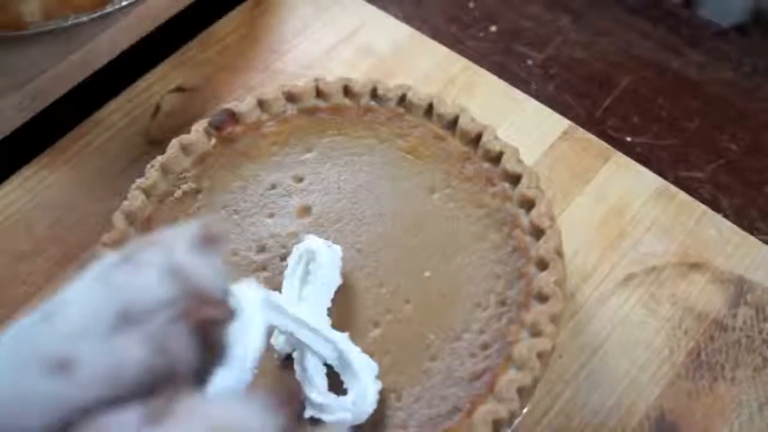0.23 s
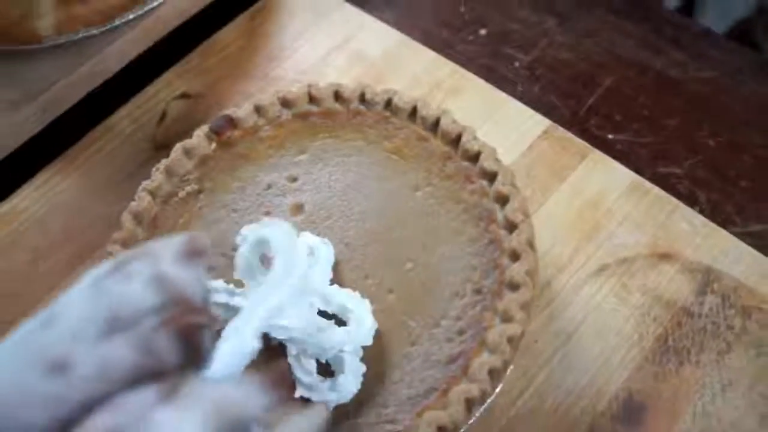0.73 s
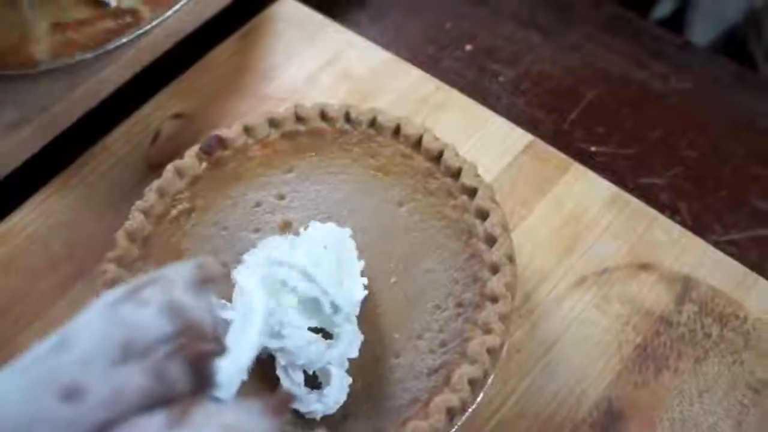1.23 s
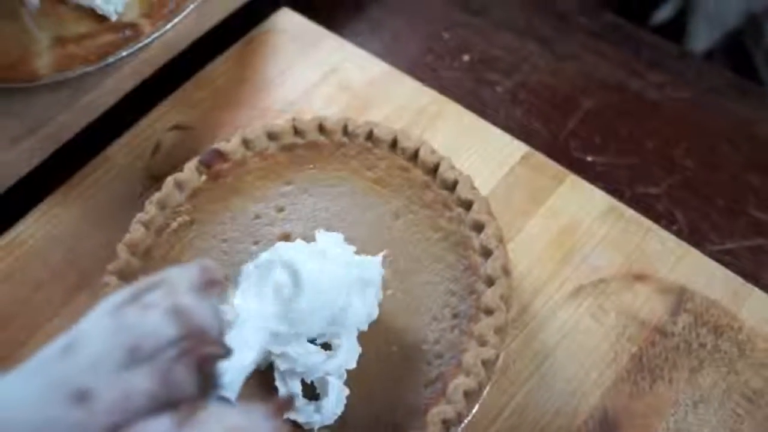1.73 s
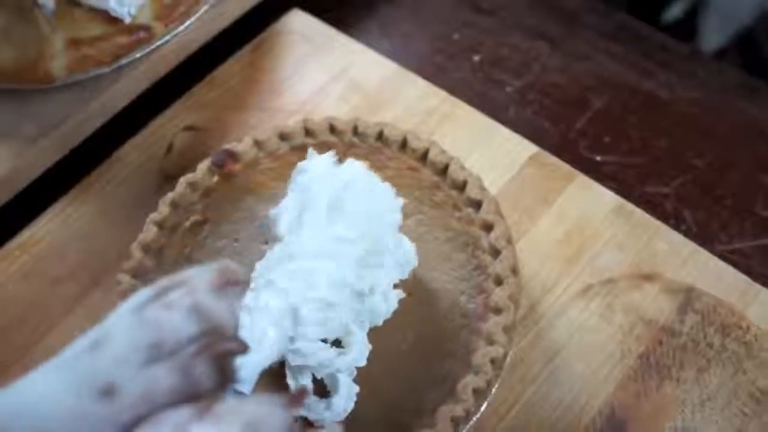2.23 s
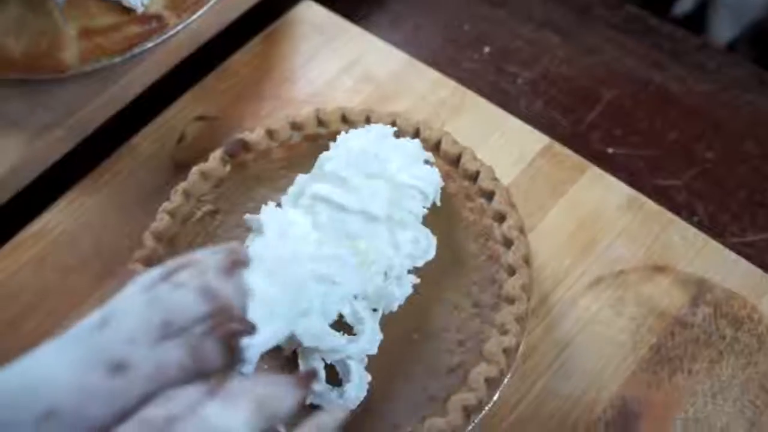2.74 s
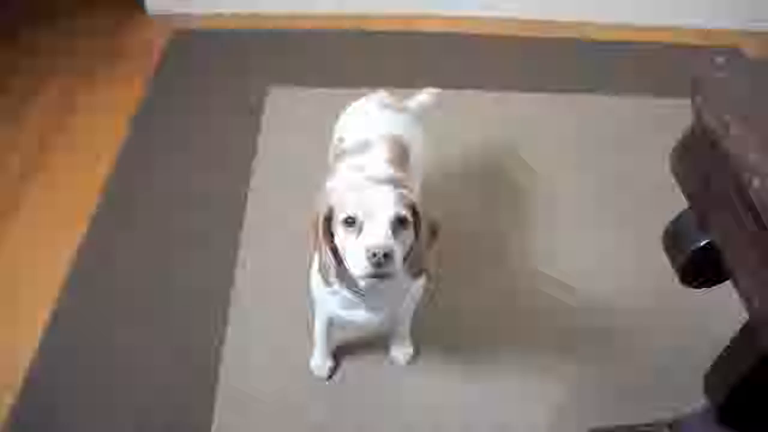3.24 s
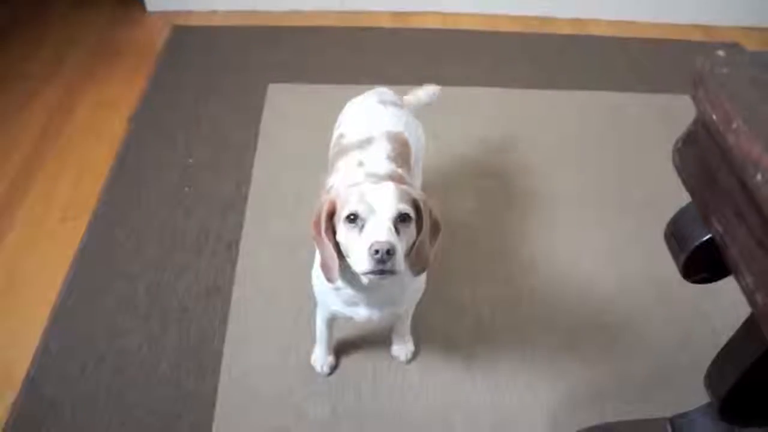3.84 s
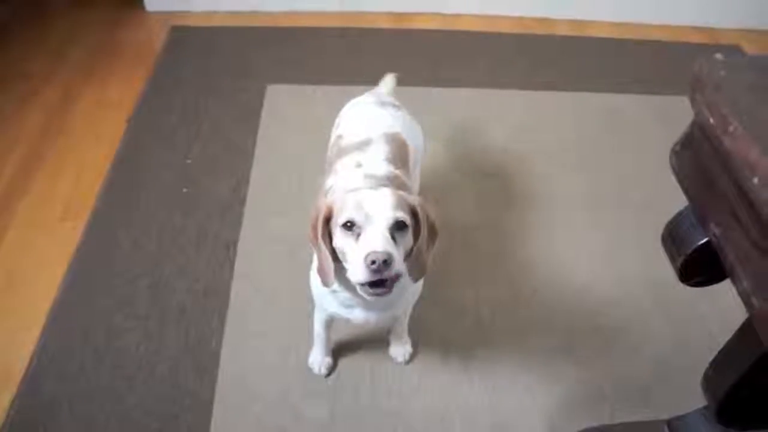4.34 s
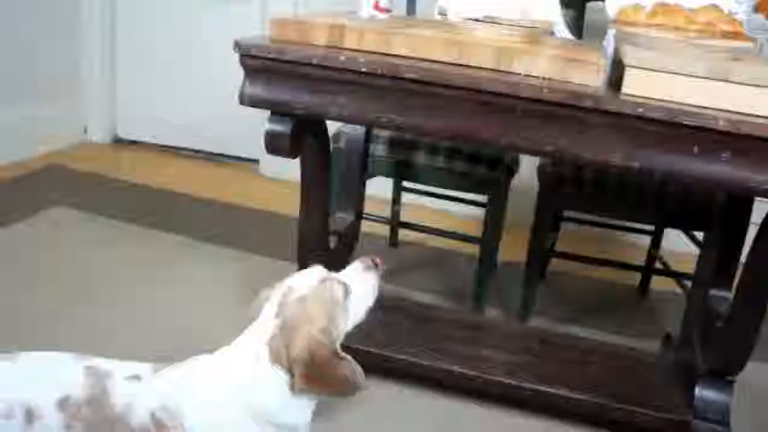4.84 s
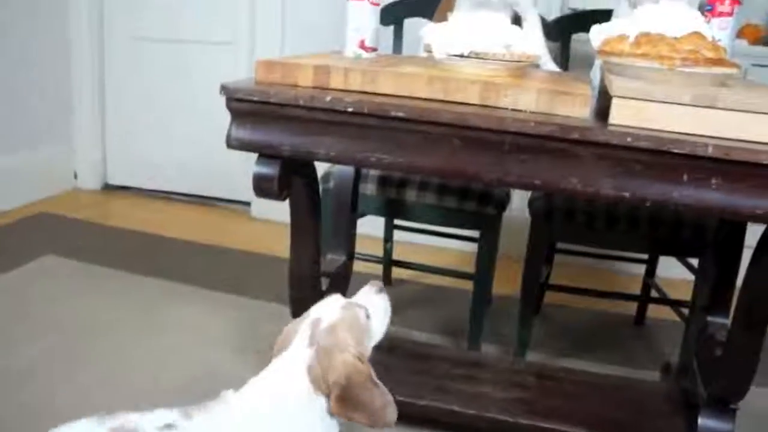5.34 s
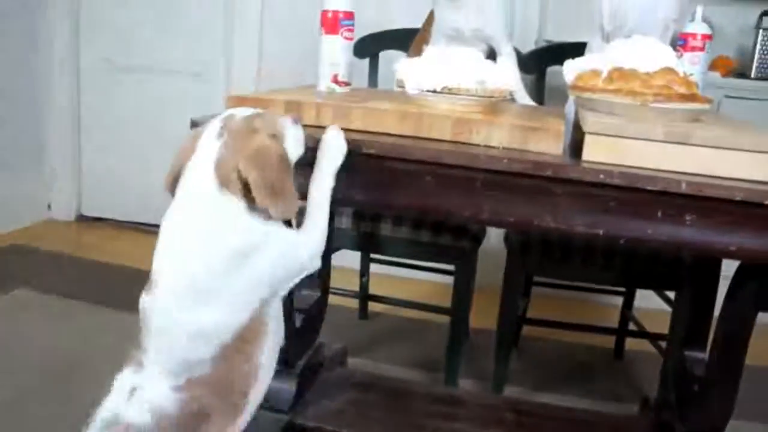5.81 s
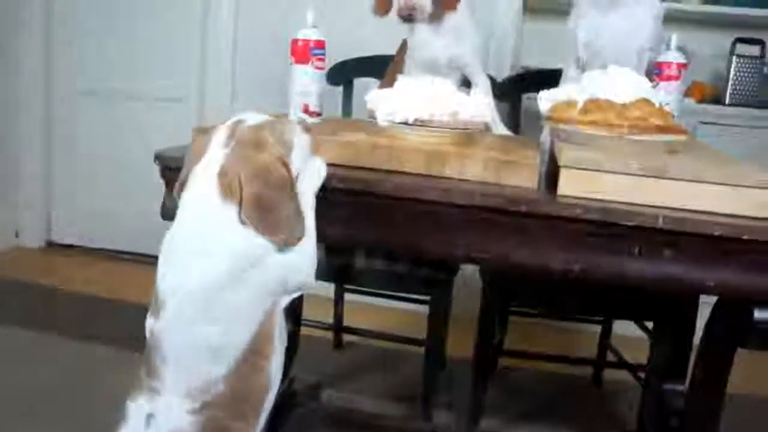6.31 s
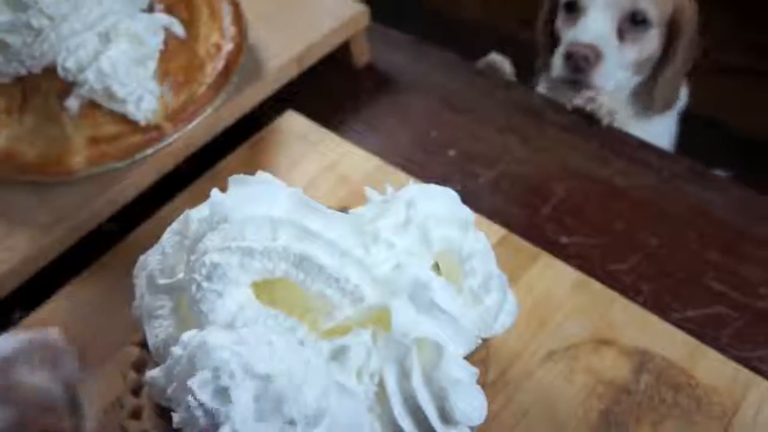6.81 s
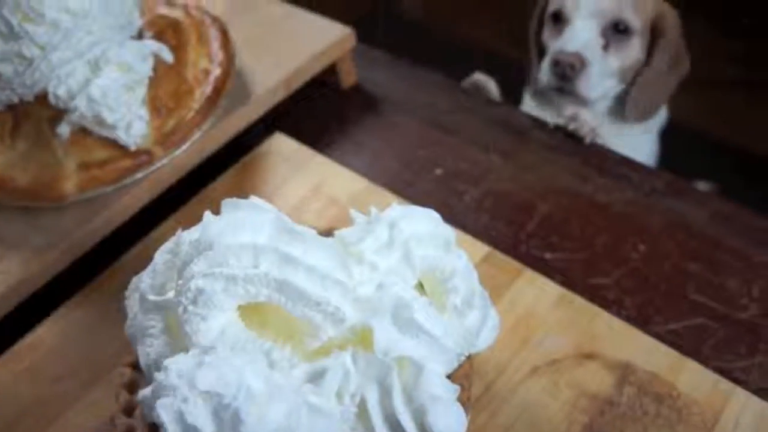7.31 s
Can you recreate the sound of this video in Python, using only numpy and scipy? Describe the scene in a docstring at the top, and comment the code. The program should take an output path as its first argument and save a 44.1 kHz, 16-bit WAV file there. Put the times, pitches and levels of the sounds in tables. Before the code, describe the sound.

A quiet kitchen, heard close in stereo, with a faint steady room hush and short reverberation. From 0 s an aerosol cream can is already spraying: a bright, gassy, whistling hiss with fine mist and light crackle. From about 1.5 to 2.5 s it turns creamier and raspier; around 2.6 s it becomes thicker, with a hollow foam gurgle. From 3.5 to 6.5 s it sputters wetly, dense with sharp little pops and cracks, its tone constantly shifting. A soft low bump at 5.5 s is almost masked. Near 6.3 s the gurgle surges, then the spray shuts off at about 6.6 s. After a tiny gap, a short, coarse, spitting squirt runs from roughly 6.75 to 7.1 s and closes quickly. Faint bright clicks of settling cream follow in near quiet. At about 7.4 s the can knocks softly and hollowly on the table with a tiny rattle.

```python
"""A kitchen, two microphones close by: a can sprays whipped cream onto a pie, one long squirt, a short one, then quiet.
Gas noise rings the jet, tip, throat and nozzle as hiss, crackle and sputter, and gurgles hollow in the foam.
Pockets bursting through the cream pop as short damped rings with a crack of noise; settling drops click faintly.
A filtered-noise tail answers over a steady hush; something soft bumps the table under the long squirt.
At the end the can knocks softly as it is put down: short damped rings at its modes."""
import sys
import numpy as np
from scipy import signal
from scipy.fft import rfft, irfft, next_fast_len
from scipy.io import wavfile
from scipy.ndimage import uniform_filter1d

SR = 44100
rng = np.random.default_rng(int(sys.argv[2]) if len(sys.argv) > 2 else 0)


def persist_wave(psi):
    """Save psi, clipped to +-1, as 16-bit WAV."""
    counts = np.round(np.clip(psi, -1, 1) * 32767).astype(np.int16)
    wavfile.write(sys.argv[1], SR, np.atleast_2d(counts).T)


N = 333377
TIME = np.arange(N) / SR
SIZE = next_fast_len(N + SR)  # room for a 1 s tail


def undb(db):
    """Amplitude factor of a level in dB."""
    return 10 ** (np.asarray(db) / 20)


def level(x, db):
    """Scale x to an rms level in dB."""
    return x * undb(db) / np.sqrt(np.mean(x ** 2))


def over_time(table):
    """A (s, value) table read at every sample, straight between rows."""
    return np.interp(TIME, *np.transpose(table))


def across(table):
    """A (Hz, value) table read at every FFT bin, straight on a log-frequency axis."""
    hz, value = np.transpose(table)
    bin_hz = np.arange(SIZE // 2 + 1) * SR / SIZE
    return np.interp(np.log(bin_hz + 1), np.log(hz), value)


def colour(x, gain):
    """Filter x by a gain given per FFT bin."""
    return irfft(rfft(x, SIZE) * gain, SIZE)[..., :N]


def resonate(x, modes):
    """Parallel band-passes; neighbours alternate in sign so that the valleys stay filled."""
    out = 0
    for k, (hz, width_hz, db) in enumerate(modes):
        band = signal.lfilter(*signal.iirpeak(hz, hz / width_hz, SR), x)
        out = out + (-1) ** k * undb(db) * band
    return out


def walk(rate_hz):
    """Smooth random wander about 0: values held 1 / rate_hz seconds and slewed twice."""
    hold = int(SR / rate_hz)
    steps = np.repeat(rng.standard_normal(N // hold + 1), hold)
    return 0.54 * uniform_filter1d(uniform_filter1d(steps, hold), hold)[:N]


def rings(events, rise_s):
    """Damped sines, one per (s, dB, Hz, t60 s) event, each swelling for rise_s first."""
    out = np.zeros(N)
    for start_s, db, hz, t60_s in events:
        t = TIME[:int((rise_s + t60_s) * SR)]
        swell = np.minimum(t / rise_s, 1) ** 2
        decay = undb(db - 60 * np.maximum(t - rise_s, 0) / t60_s)
        ring = np.sin(2 * np.pi * hz * t) * swell * decay
        i = int(start_s * SR)
        out[i:i + len(t)] += ring[:N - i]
    return out


# Spectrum of the room hush. Each row: frequency in Hz, relative level in dB per Hz.
HUSH = [(15, -29), (25, -8), (60, -8.5), (105, -13), (243, -5), (501, -5.5), (604, -14), (749, -4),
        (856, -10.5), (1150, -9), (2180, -19.5), (9000, -27.5), (15000, -36)]
HUSH_RMS_DB = -61


def kitchen():
    """Steady hush of the room; its bass is largely common to both microphones, its treble is not."""
    mid, side = colour(rng.standard_normal((2, N)), undb(across(HUSH)))
    side_db = across([(40, -12.5), (500, -6.5), (3000, 1.5)])
    side = colour(side, undb(side_db))
    return level(np.array([mid + side, mid - side]), HUSH_RMS_DB)


# Reverberation of the kitchen. Each row: frequency in Hz, decay time t60 in s.
WALL_T60 = [(150, 0.35), (600, 0.53), (1500, 0.14), (3000, 0.2), (8000, 0.26)]
WALLS_DB = -11


def walls(x):
    """Reverberant tail: noise octaves with their own decay, alike at both microphones in the bass."""
    t, tail = TIME[:SR], 0
    table_hz, table_t60_s = np.transpose(WALL_T60)
    for hz in 125 * 2 ** np.arange(7):
        t60_s = np.interp(np.log(hz), np.log(table_hz), table_t60_s)
        mid, side = resonate(rng.standard_normal((2, SR)), [(hz, 1.1 * hz, 0)])
        band = mid + min(hz / 5000.0, 1) * side * np.array([[1], [-1]])
        tail = tail + band * undb(-60 * t / t60_s) * np.minimum(t / 0.00085, 1)
    tail = tail / np.sqrt(np.sum(tail ** 2, axis=1, keepdims=True))  # unit energy
    return colour(x, rfft(tail, SIZE)) * undb(WALLS_DB)


# Something soft bumps the table. Each row: start in s, level in dB, pitch in Hz, decay time t60 in s.
BUMP_EVENTS = [(5.544, -46, 85, 0.08)]


def bumps():
    """A low table thump: a damped sine with a slow rise."""
    return rings(BUMP_EVENTS, 0.0098)


# The can knocks and rocks on the table. Each row: start in s, level in dB.
KNOCKS = [(7.399, -52), (7.4405, -34), (7.461, -45.5), (7.468, -44), (7.476, -46), (7.483, -48)]
# Modes of the can. Each row: frequency in Hz, level in dB, decay time t60 in s.
CAN_MODES = [(320, -13, 0.045), (515, -12, 0.03), (710, -8, 0.03), (844, -12, .025), (1080, -3.5, 0.032)]


def can():
    """Every knock rings the same modes of the half-empty can."""
    events = [(s, db + mode_db, hz, t60_s) for s, db in KNOCKS for hz, mode_db, t60_s in CAN_MODES]
    return rings(events, 0.00064)


HOLLOW_HZ, HOLLOW_WIDTH_HZ, HOLLOW_DEPTH = 4900, 1500, 0.43  # the tip passes little of a pop here


def pops(events, cycles, crack_db):
    """A bursting pocket rings a few cycles at its pitch; a ragged crack of noise lasts a little longer."""
    body = rings([(s, db, hz, cycles / hz) for s, db, hz in events], 0.00076)
    shape = signal.lfilter([1], [1, -np.exp(-1 / (0.00061 * SR))], np.abs(body)) / (0.00055 * SR)
    crack_modes = [(1740, 740, crack_db + 0.5), (3570, 890, crack_db + 7.0), (7000, 3800, crack_db - 3.5)]
    crack = resonate(shape * rng.standard_normal(N), crack_modes)
    pop = 0.6 * body + 0.85 * crack
    return pop - HOLLOW_DEPTH * resonate(pop, [(HOLLOW_HZ, HOLLOW_WIDTH_HZ, 0)])


POPS_PER_S, POP_LOW_HZ, POP_HIGH_HZ = 55, 1540, 3880
POP_DB, POP_SPREAD_DB = -18, 4  # at 0 dB cream; spread to either side
POPS_FROM_S, POPS_EARLY_DB = 3.35, -3  # the jet spits more once the heap of cream is high


def random_pops(cream_db):
    """Pops at random moments and pitches, louder where the jet carries more cream."""
    moment, size, pitch, keep = rng.random((500, 4)).T
    kept = keep < POPS_PER_S * N / SR / len(keep)
    start_s = moment * N / SR
    db = POP_DB + cream_db[(start_s * SR).astype(int)]
    db = db + 2 * POP_SPREAD_DB * (size - 0.5)
    db = db + POPS_EARLY_DB * (start_s < POPS_FROM_S)
    hz = POP_LOW_HZ * (POP_HIGH_HZ / POP_LOW_HZ) ** np.sqrt(pitch)  # leans to the high end
    return np.transpose([start_s, db, hz])[kept]


# The finger on the valve. Each row: fully open from in s, starts to close in s.
VALVE_TIMES = [(0, 6.57), (6.768, 7.075)]
OPEN_DB_PER_S, CLOSE_DB_PER_S, CLOSE_DB_PER_S2 = 283, 202, 802.5


def valve():
    """Gain of the valve: it opens at a steady rate in dB and closes ever faster."""
    power = 0
    for opens_s, closes_s in VALVE_TIMES:
        early_s, late_s = np.maximum(opens_s - TIME, 0), np.maximum(TIME - closes_s, 0)
        loss_db = OPEN_DB_PER_S * early_s + CLOSE_DB_PER_S * late_s + CLOSE_DB_PER_S2 * late_s ** 2
        power = power + undb(-2 * loss_db)
    return np.sqrt(power)


def puffs(rate_hz, spread_db, length_s, steady_db, surge_db):
    """Gas pockets burst at random: short noise puffs, few large, over a steady flow; rows mid, side."""
    size_db = spread_db * np.minimum(rng.exponential(size=N), 3)
    starts = (rng.random(N) < rate_hz / SR) * undb(size_db)
    power = signal.lfilter([1], [1, -np.exp(-1 / (length_s * SR))], starts ** 2)
    flow = np.sqrt(power / power.mean() + undb(2 * steady_db))
    return flow * undb(surge_db * walk(25)) * rng.standard_normal((2, N))


SHIFT_HZ, SHIFT_DB, SHIFT_BELOW_HZ = 6, 1.6, 3000  # SHIFT_DB scales the wander


def shifting(x, modes):
    """Foam reshapes the passage: each low resonance swells and fades on its own."""
    out = 0
    for k, mode in enumerate(modes):
        swing_db = SHIFT_DB * walk(SHIFT_HZ) * (mode[0] < SHIFT_BELOW_HZ)
        out = out + (-1) ** k * undb(swing_db) * resonate(x, [mode])
    return out


# Resonances of the open jet. Each row: frequency in Hz, width in Hz, level in dB.
JET_MODES = [(130, 47, -14.5), (191, 32, -11), (230, 42, -6), (330, 60, -7), (480, 81, -4.5),
             (768, 74, -1.5), (1240, 95, -2), (1973, 280, -5), (2540, 103, -2.5), (2840, 210, -3.5),
             (4270, 860, -4), (5600, 620, 1), (6460, 470, 5), (7260, 950, 2), (8210, 880, 1.5)]
# Resonances of the fine mist. Each row: frequency in Hz, width in Hz, level in dB.
MIST_MODES = [(7140, 720, -3), (9490, 2230, 1.5), (13770, 1950, -4)]
# Resonances of the tip. Each row: frequency in Hz, width in Hz, level in dB.
TIP_MODES = [(3016, 600, -1.5), (3740, 1340, 0.5), (5630, 3100, -7.5)]
# Resonances of the throat. Each row: frequency in Hz, width in Hz, level in dB.
THROAT_MODES = [(1598, 159, 1), (1916, 440, 0), (2357, 680, -1.5)]
# Resonances of the nozzle. Each row: frequency in Hz, width in Hz, level in dB.
NOZZLE_MODES = [(70, 82, -20.5), (123, 30, -23.5), (276, 172, -10.5), (492, 91, -4.5), (792, 90, 0),
                (904, 180, -2), (1185, 307, 0)]
# Resonances of the foam. Each row: frequency in Hz, width in Hz, level in dB.
FOAM_MODES = [(190, 90, -22), (330, 60, -14), (466, 30, -3), (506, 34, 0), (598, 64, -1), (677, 24, 3),
              (790, 80, -7), (935, 70, -5)]


def gas_voices():
    """Jet whistle, mist, tip crackle, throat rasp, nozzle sputter, foam gurgle: puffs through resonances."""
    bursts = puffs(350, 3.0, 0.00039, -0.034, 1.0)  # shared by tip, throat and nozzle
    throat_flow = bursts + 0.85 * level(rng.standard_normal((2, N)), 0)
    nozzle_flow = bursts + 2.05 * level(puffs(200, 4.7, 0.0011, 0.36, 0.94), 0)
    return [shifting(puffs(450, 4.2, 0.0012, 0.37, 1.0), JET_MODES),
            resonate(puffs(600, 2.5, 0.0015, 1.1, 2.1), MIST_MODES),
            resonate(bursts, TIP_MODES),
            shifting(throat_flow, THROAT_MODES),
            shifting(nozzle_flow, NOZZLE_MODES),
            shifting(puffs(150, 0.55, 0.0049, 1.11, 0.31), FOAM_MODES)]


# Rings of the spout. Each row: frequency in Hz, width in Hz.
SPOUT_RINGS = [(760, 130), (1180, 230), (1650, 220), (3080, 400), (6400, 700)]
# How far each ring stands out. Each row: time in s, then dB of each ring from lowest to highest.
SPOUT_RINGING = [(0, -3.5, 0.5, -6, 2.5, 2), (1.0, -2, -1, -2, 0.5, 2), (1.5, -3, 0.5, -3, 0.5, -8),
                 (1.9, -2.5, -0.5, 0, -4, -1), (2.1, -3.5, 3, 5.5, -1, -3), (2.5, -1.5, -2.5, 4.5, 1, -3),
                 (2.7, -3, 1.5, -2, 0.5, -1.5), (2.95, -1.5, 2, 2.5, -2, 1), (3.1, 2.5, 2.5, -2, -1, -1),
                 (3.3, 4, -1, 1.5, -4, 0), (3.5, 4, 6.5, 1, -6, 3), (3.62, 0, -2, 0, -6, 2),
                 (3.75, 2, 6.5, 6, 2, 5), (3.85, 2.5, 3, -2, -2, 1), (3.95, -2.5, -2, 0, -9, 2),
                 (4.1, 2, 0, -0.5, 4, 3.5), (4.2, -3, 0, 2.5, 0, 0), (4.3, -1, 6, -4, 2, 1.5),
                 (4.45, -1, 1.5, -2, -1, 4), (4.6, -3, 2, -3, 1.5, 2.5), (5.0, -1.5, 3.5, 1, -1, 3),
                 (5.4, -0.5, 1, -4.5, -3, -1), (5.9, 0, -1.5, -5, -2, 0.5),
                 (6.3, -3.5, -3.5, -0.5, -3, 4.5), (6.55, 0, 1.5, 0, 1, 3.5), (6.7, -4, -3, 6, -2, 3),
                 (6.8, -9.5, 0.5, 1, 3.5, -4), (6.88, -12, -0.5, -1, 0, -2),
                 (6.98, -4.5, 7.5, -3.5, 3, 1.5), (7.07, -6, -7, 4.5, 4, -5), (7.2, -2, 0, 2.5, -5, -5)]


def spout(x):
    """Each ring of the spout lifts or lowers its part of the hiss."""
    time_s, *columns_db = np.transpose(SPOUT_RINGING)
    out = x
    for (hz, width_hz), db in zip(SPOUT_RINGS, columns_db):
        out = out + (undb(np.interp(TIME, time_s, db)) - 1) * resonate(x, [(hz, width_hz, 0)])
    return out


# The can travels across the pie. Each row: time in s, place (0 near rim, 1 far rim,
# 2 place of the second squirt).
TRAVEL = [(2.3, 0), (2.55, .2), (2.65, .7), (3.4, 1), (6.62, 1), (6.72, 2)]


def way():
    """How much the can is at each of its three places, 0-1."""
    distance = np.abs(over_time(TRAVEL) - np.arange(3)[:, None])
    return np.clip(1 - distance, 0, 1)


# What the microphones do not share, one list per place. Each row: frequency in Hz, side minus mid in dB.
PLACE_WIDTH = [
    [(60, -16.5), (200, -22), (650, -29), (950, -25), (1300, -38), (2300, -6), (3200, -5), (4400, -4),
     (8100, -4), (15000, 0.5)],
    [(60, -6.5), (200, -14), (400, -21), (650, -16.5), (950, -4), (1300, -17.5), (2300, -11.5),
     (3200, -9.5), (4400, 0), (8100, -4), (15000, -2)],
    [(60, -11), (300, -16), (1400, -26), (2400, -13.5), (3300, -7), (6000, -1.5), (15000, -3.5)],
]
# Phase between microphones, one list per place. Each row: frequency in Hz, left lead in radians.
PLACE_LEAD = [
    [(100, 0), (2500, .3), (3700, 1.2), (4700, 2.6), (5600, 2), (6100, 2.6), (7700, .3), (9300, 1.8),
     (9900, .6), (11000, 0)],
    [(100, 0), (950, -.2), (1200, 0), (3000, 0), (3900, .9), (4150, 1.4), (4600, 1), (6400, .9), (8000, 0),
     (10200, .6), (11200, 0)],
    [(2400, 0), (3300, 1.1), (4700, 1.8), (5400, 2.1), (8000, 1.9), (9000, 2.6), (15000, 2.6)],
]


def placed(mid, side):
    """Left and right for the can at each place, blended as it travels."""
    out = 0
    for apart, lead, share in zip(PLACE_WIDTH, PLACE_LEAD, way()):
        wide = colour(side, undb(across(apart)))
        turn = np.exp(0.5j * across(lead))
        out = out + share * colour(np.array([mid + wide, mid - wide]), np.array([turn, 1 / turn]))
    return out


# How the can is held. Each row: time in s, then in dB gas pressure, cream in the jet, foam round the tip,
# dullness of the cream.
HOLD = [(0, 2, -25, -25, -11), (.45, -0.5, -20, -14.5, 7), (.52, 2.5, -18, -20, 3),
        (.82, -0.5, -15.5, -22, 5), (1.0, 0.5, -15.5, -23, 2.5), (1.3, 1, -15, -16.5, -4),
        (1.52, 1, -9.5, -15.5, -0.5), (1.77, 1, -9, -21.5, -4.5), (2.08, 1, -4, -15.5, -4.5),
        (2.58, 1, -5, -19, 0.5), (2.62, 1.5, 1, -5.5, -0.5), (2.77, 1, -1, -11, 0), (3.0, 0, -0.5, -8, 0),
        (3.27, 0.5, 3, -3.5, -1.5), (3.3, -0.5, 0, -5, 3.5), (3.4, -2, -4, -5, 4),
        (3.55, -3, -2.5, -8, 0.5), (3.7, -2.5, -2.5, -14, 2), (3.9, -2, -3, -3, 3),
        (4.18, -1, -4.5, -11, -1), (4.41, -2, -3.5, -6, 4.5), (4.55, -2.5, -3.5, -7.5, 1),
        (5.0, -2, -5, -2, 2.5), (5.45, -2, -3.5, 1.5, 3), (6.2, -2, -2.5, 0, 1), (6.27, -1.5, 4, 4.5, -4),
        (6.31, -0.5, 3, 11.5, -0.5), (6.39, -1.5, 3.5, 4.5, 1), (6.46, -1, -3.5, 7, 3.5),
        (6.54, -3, -5, 1, 0), (6.59, -2, -6, -1.5, 2.5), (6.63, -2, -9, 3.5, 8), (6.645, 0.5, -13, -3, 9.5),
        (6.69, 4, -4, 2, 12), (6.73, 1.5, -1.5, 2, 10), (6.77, 1, 0, -9.5, 2), (6.87, -1, 6.5, -5.5, -2.5),
        (6.94, -1, 3.5, -10, -5), (7.04, 1, 6.5, -8.5, -2.5), (7.075, 0.5, 2, -18, 5),
        (7.09, 1, -1, -17, 3.5), (7.12, 1.5, 3.5, -18, 5), (7.15, 4.5, 14, -19, -3),
        (7.165, 3, 2.5, -15, 3)]
# How each gas voice follows the hold. Each row: base rms level in dB, then dB per dB of pressure, of cream,
# of foam, of dullness. Rows in the order of gas_voices().
VOICE_LAWS = [(-32, 2, 0.012, -0.015, 0.14), (-34, 1.52, 0.3, 0.026, 0.17), (-31, 0.27, 0.93, -0.023, -0.3),
              (-30.5, -0.4, 0.99, -0.03, -0.14), (-30.5, -0.27, 0.95, 0.079, 0.68),
              (-31, 0.1, .01, 0.95, -0.22)]
# Own wander of each voice, in dB per unit of walk.
VOICE_SWELL_DB = [0.69, 1.7, 1.9, 0.97, 1.1, 1.8]
SWELL_HZ = 12
# The throat rings more or less. Each row: time in s, gain in dB.
THROAT_GAIN = [(0, -3.5), (1.3, 5.5), (1.9, -1), (2.1, -3), (2.45, -2.5), (2.65, 1.5), (3.2, 0.5), (3.7, 0),
               (4.1, 2.5), (4.2, 2), (4.6, 2), (5.6, 1.5), (6.4, 0.5), (6.8, -2), (7.1, -4.5)]
# Single pops and a few low foam gurgles, each at its own moment. Each row: start in s, level in dB, pitch in Hz.
SINGLE_POPS = [(0.307, -19, 1930), (0.6754, -24, 2800), (1.5599, -14, 1900), (1.9984, -14, 1670),
               (2.3143, -12, 1620), (2.9886, -21.5, 3490), (3.5185, -13, 1290), (3.5562, -6.5, 3240),
               (3.8172, -8, 2360), (3.849, -8.5, 970), (3.875, -12, 3400), (3.9355, -7, 3420),
               (3.948, -10, 3400), (3.9726, -6, 1770), (3.989, -15, 3320), (4.07, -14, 3600),
               (4.122, -12, 2230), (4.1423, -10, 1980), (4.178, -21, 1600), (4.2028, -19, 1590),
               (4.3798, -8, 1670), (4.412, -12, 1190), (4.546, -10, 3700), (4.568, -12, 1640),
               (4.685, -6, 3300), (4.828, -5, 3320), (4.836, -11, 3400), (4.865, -8, 3420),
               (4.9062, -7, 2120), (4.927, -11, 3600), (5.009, -9, 1610), (5.0684, -9, 1560),
               (5.082, -9, 3530), (5.2, -10, 1590), (5.2515, -8.5, 2200), (5.3916, -10, 2180),
               (5.145, -16, 3500), (5.479, -6.5, 3030), (5.516, -14, 2900), (5.5267, -6, 3020),
               (5.5533, -17, 3400), (5.571, -8, 3000), (5.674, -12, 2180), (5.76, -15, 3600),
               (5.796, -10, 3400), (5.97, -18, 3700), (6.0795, -6, 3470), (6.099, -7, 3680),
               (6.11, -11, 3500), (6.1165, -9, 1700), (6.118, -3.5, 1910), (6.1624, -8.5, 3470),
               (6.228, -4, 3840), (6.254, -21.5, 3060), (6.5665, -11.5, 2192), (6.588, -20.5, 3400),
               (6.597, -24, 2900), (6.603, -29, 550), (6.629, -32, 500), (6.718, -27, 600),
               (6.728, -25.5, 550), (6.7455, -12, 1500), (6.7702, -7, 1670), (6.7702, -8, 3300),
               (6.787, -13.5, 3220), (6.793, -8.5, 1410), (6.799, -6, 3000), (6.8485, -2.5, 2920),
               (7.021, -7, 3200), (7.052, -9.5, 3100), (7.062, -11.5, 3000), (7.071, -7, 2800),
               (7.13, -26, 2500), (7.1382, -13.5, 3180), (7.147, -22.5, 2190)]
# Drops of cream settle with faint bright clicks. Each row: start in s, level in dB, pitch in Hz.
DROP_CLICKS = [(6.6294, -39, 3600), (6.6774, -32, 3630), (7.165, -34, 5500), (7.181, -42, 3500),
               (7.207, -43, 3000), (7.2903, -39, 7600), (7.398, -44, 6490)]
# The can wanders sideways. Each row: time in s, left minus right in dB.
PAN = [(0, 0.5), (2.2, 0.5), (2.8, -1), (4.6, -1), (5.8, -1.5), (6.6, 0), (7.1, 0.5)]


def spray():
    """Six gas voices led by pressure, cream, foam and dullness, with pops and drops, placed in stereo."""
    time_s, *columns_db = np.transpose(HOLD)
    pressure, cream, foam, dull = (np.interp(TIME, time_s, c) for c in columns_db)
    voices = [level(v, law[0]) for v, law in zip(gas_voices(), VOICE_LAWS)]
    voices[3] = voices[3] * undb(over_time(THROAT_GAIN))
    hiss = 0
    for voice, (_, a, b, c, d), swell_db in zip(voices, VOICE_LAWS, VOICE_SWELL_DB):
        lead_db = a * pressure + b * cream + c * foam + d * dull
        hiss = hiss + voice * undb(lead_db + swell_db * walk(SWELL_HZ))
    mid, side = spout(hiss)
    gate = valve()
    mid = gate * (mid + pops(random_pops(cream), 2.8, 2))
    mid = mid + pops(SINGLE_POPS, 8.2, 2.3) + pops(DROP_CLICKS, 7.3, 0.5)
    pan_db = over_time(PAN)
    return placed(mid, gate * side) * undb(np.array([pan_db, -pan_db]) / 2)


# Dips where the echo off pie and board cancels. Each row: frequency in Hz, width in Hz, depth 0-1,
# depth 0-1 at the far rim.
ECHO_DIPS = [(1430, 110, 0.5, 0.2), (880, 36, 0.3, 0.35)]


def table_echo(x):
    """Dips in the spectrum whose depth follows the can to the far rim and back."""
    for hz, width_hz, depth, far_depth in ECHO_DIPS:
        dip = np.clip(depth + (far_depth - depth) * way()[1], 0, 1)
        x = x - dip * resonate(x, [(hz, width_hz, 0)])
    return x


LOW_HZ, LOW_LEFT_DB = 114.4, -25.5


def small_source(x):
    """So small a source radiates little deep bass: a high-pass plus a faint unfiltered rest."""
    high_pass = signal.butter(6, LOW_HZ, "high", fs=SR, output="sos")
    return signal.sosfilt(high_pass, x) + undb(LOW_LEFT_DB) * x


def scene():
    """Spray and can close by, then bump, tail and hush."""
    near = small_source(table_echo(spray()) + can())
    return near + bumps() + walls(near.mean(axis=0)) + kitchen()


# Colour between the microphone ports. Each row: frequency in Hz, left minus right in dB.
PORT_LEAN = [(60, 1.5), (250, -2), (500, 0), (1300, 0), (2600, -2.5), (3600, -4.5), (4300, -2.5),
             (5500, -0.5), (6400, -3), (7500, 0), (12000, 0), (15000, 1.5)]
TOP_HZ = 15650


def record(dry):
    """The two microphone ports lean a little apart in colour; the recorder cuts the top."""
    left = undb(across(PORT_LEAN) / 2)
    low_pass = signal.ellip(10, 0.2, 70, TOP_HZ, fs=SR, output="sos")
    return signal.sosfilt(low_pass, colour(dry, np.array([left, 1 / left])))


dry = scene()
out = record(dry)
persist_wave(out)
```